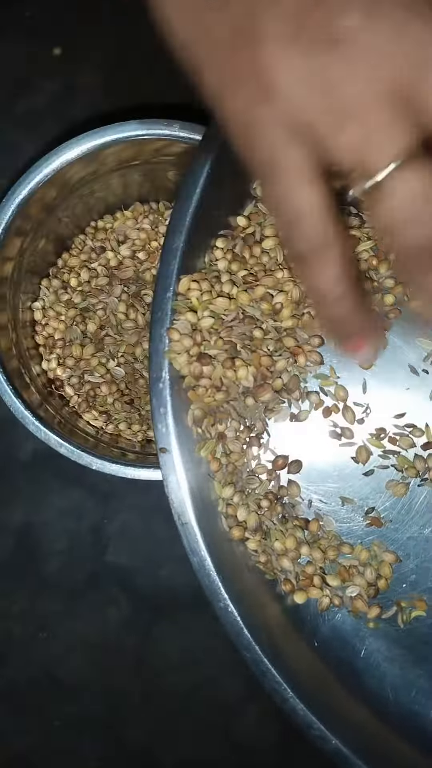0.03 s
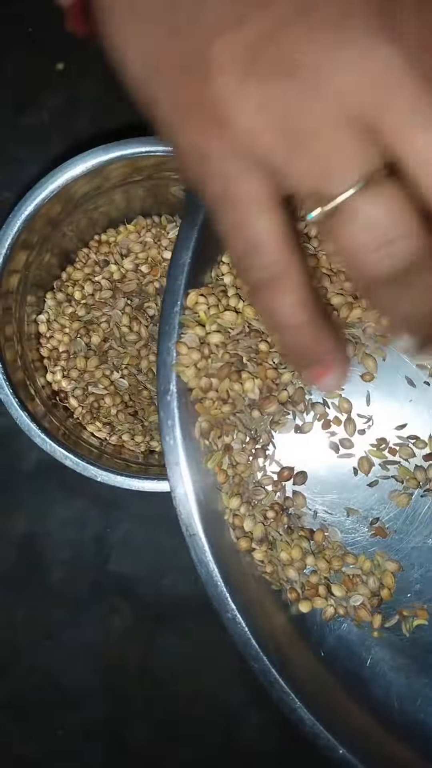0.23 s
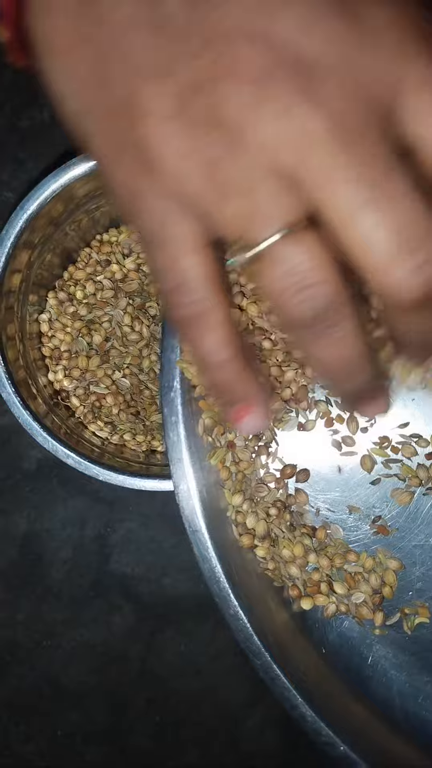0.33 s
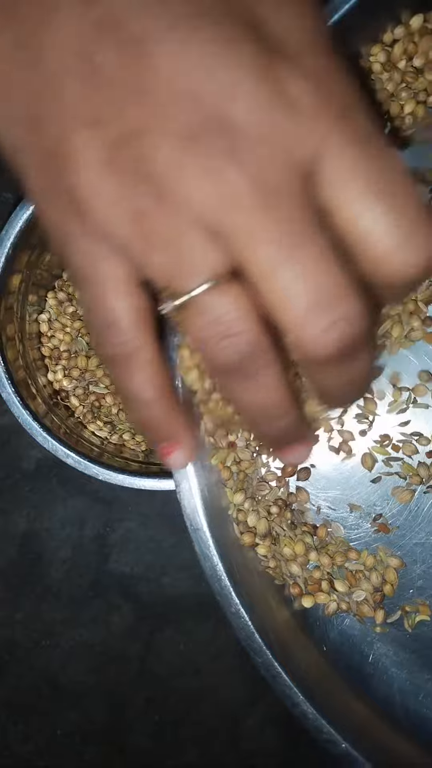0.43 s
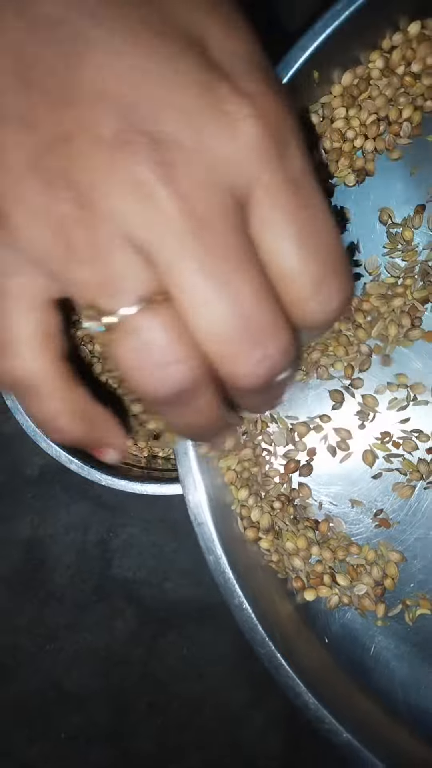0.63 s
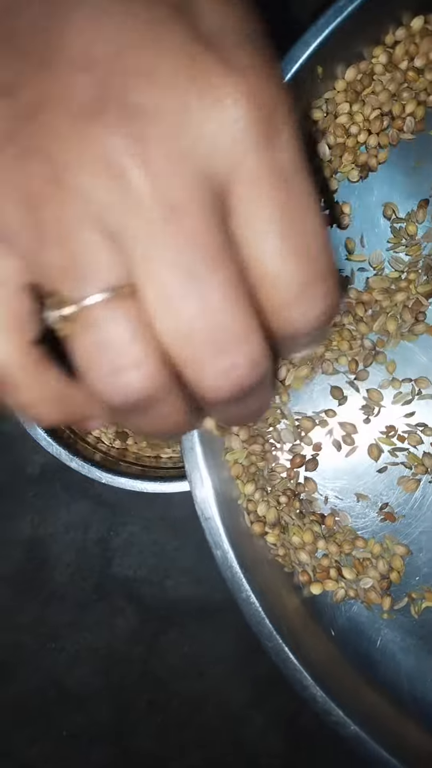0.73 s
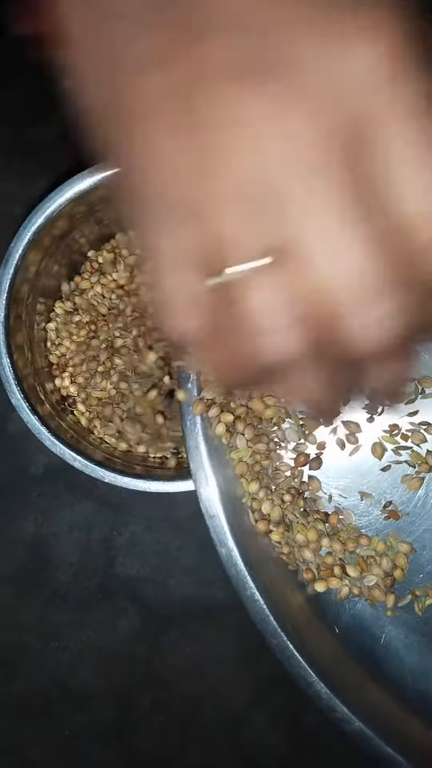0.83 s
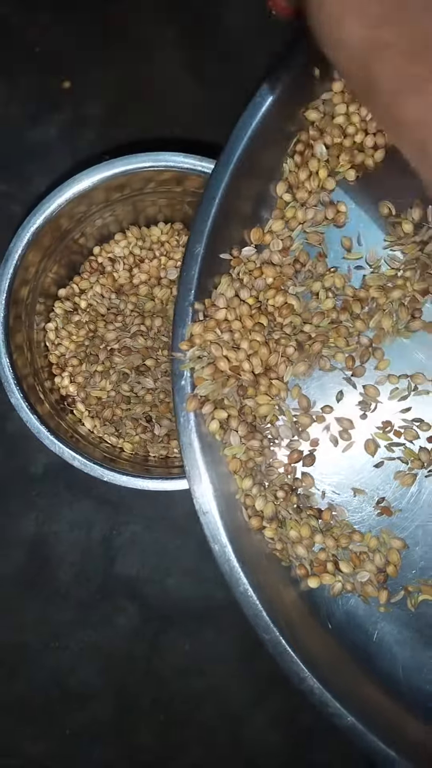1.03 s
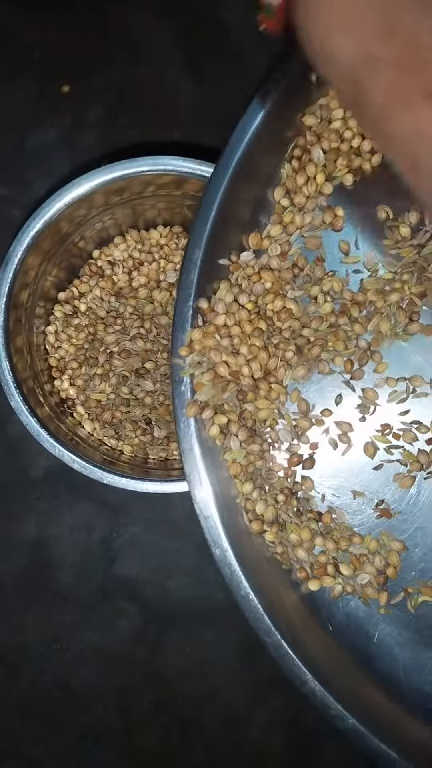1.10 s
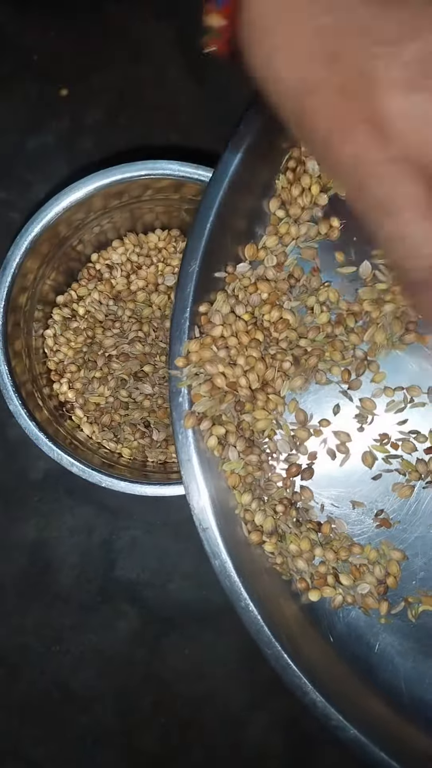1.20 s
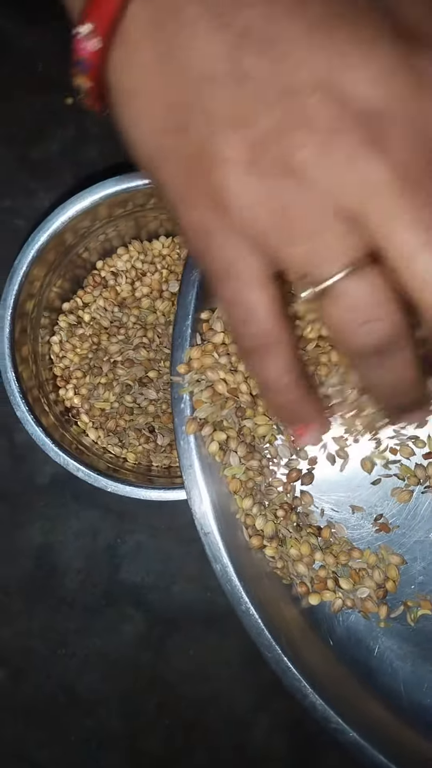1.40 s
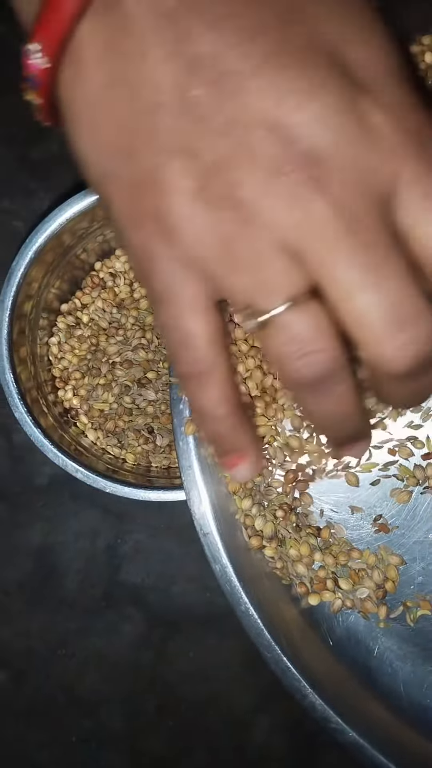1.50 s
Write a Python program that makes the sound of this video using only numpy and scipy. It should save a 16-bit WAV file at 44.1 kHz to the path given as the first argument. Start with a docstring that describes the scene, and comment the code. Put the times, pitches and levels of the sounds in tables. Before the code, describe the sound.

Dry seeds rustle as a hand sweeps them across a steel plate in two strokes, heard close up indoors. The plate knocks on a steel bowl each time, and between strokes seeds patter into the bowl with tiny pings.

```python
"""Indoors, close to a steel plate whose edge rests on a steel bowl, a hand sweeps dry seeds.
Twice the hand lands and the plate knocks on the rim. The seeds rustle under the fingers,
and the plate shudders as the fingers drag to its edge. Seeds spill over and patter into
the bowl, ticking and making the steel ring. A low hum fills the room."""
import sys
import numpy as np
from scipy import signal
from scipy.io import wavfile

SR = 44100
rng = np.random.default_rng(int(sys.argv[2]) if len(sys.argv) > 2 else 0)


def inscribe(sig):
    """Save sig as 16-bit PCM at rate SR to the path in sys.argv[1].

    A 1-D sig is mono; a 2-D sig holds one channel per row.
    Samples are clipped to [-1, 1] before scaling.
    """
    pcm = np.round(np.clip(np.atleast_2d(sig).T, -1, 1) * 32767)
    wavfile.write(sys.argv[1], SR, pcm.astype(np.int16))


N = 68355
T = np.arange(N) / SR
AGE = T[:round(.6 * SR)]  # seconds since a hit


def amp(db):
    """Turns decibels (dB) into a number to multiply by."""
    return 10 ** (np.asarray(db) / 20)


def unit(x):
    """Scales a sound to an average strength (rms) of 1."""
    return x / np.sqrt(np.mean(x ** 2) + 1e-20)


def level(points, column=1):
    """Loudness over time, following one dB column of a table."""
    rows = np.array(points)
    return amp(np.interp(T, rows[:, 0], rows[:, column]))


def through(x, response):
    """Every push in x sets off a copy of the response."""
    return signal.oaconvolve(x, response)[:N]


def impulse(s, db):
    """One instant push at s seconds."""
    return amp(db) * (np.arange(N) == round(s * SR))


def colour(x, tone):
    """Makes each pitch louder or softer, following rows of Hz and dB."""
    hz, db = np.transpose(tone)
    freqs = abs(np.fft.fftfreq(4096, 1 / SR))
    log_gain = np.log(amp(np.interp(np.log(freqs + 1), np.log(hz), db)))
    spectrum = np.exp(signal.hilbert(log_gain).conj())  # nothing sounds before its push
    return through(x, np.fft.ifft(spectrum).real[:len(freqs) // 2])


def soften(x, hz):
    """A softer contact holds less treble."""
    r = np.exp(-2 * np.pi * hz / SR)
    return signal.lfilter([1 - r], [1, -r], x)


def highpass(x, hz):
    """Turns down the bass below hz."""
    return signal.sosfilt(signal.butter(2, hz, "high", fs=SR, output="sos"), x)


def ring(notes):
    """The dying notes of a struck object. In its fade time, a note drops by 60 dB."""
    return sum(amp(db - 60 * AGE / fade_s) * np.sin(2 * np.pi * hz * AGE) for hz, db, fade_s in notes)


def scatter(x, fade_s, tail_db):
    """Adds a quickly dying wash of echoes from the steel and nearby surfaces."""
    tail = rng.standard_normal(len(AGE)) * amp(-60 * AGE / fade_s) * (1 - np.exp(-AGE / 0.001))
    return x + amp(tail_db) * through(x, tail / np.linalg.norm(tail))


def grains(per_s, spread_db):
    """Random tiny hits, most weak and a few strong."""
    size = amp(spread_db * np.minimum(rng.exponential(1, N), 4))
    return size * rng.choice([-1, 1], N) * (rng.random(N) < per_s / SR)


# The room's rumble, then its hum. Each row: pitch in Hz, relative level in dB.
RUMBLE_TONE = [(25, -42.5), (45, -10.5), (65, -8), (92, 2), (125, -3), (170, -1.5), (240, -6.5), (330, -13),
               (450, -24.5), (700, -44), (2000, -49), (15000, -40)]
HUM_NOTES = [(150, -71.5), (200, -80.5)]

def room():
    """A low rumble with a steady hum."""
    hum = sum(amp(db) * unit(np.sin(2 * np.pi * (hz * T + rng.random()))) for hz, db in HUM_NOTES)
    return hum + amp(-70.5) * unit(colour(rng.standard_normal(N), RUMBLE_TONE))


# The tone of a seed's tick. Each row: pitch in Hz, relative level in dB.
TICK_TONE = [(1000, -45), (4000, -31), (6200, -10.5), (8000, -16), (10000, -14.5), (11800, -6),
             (13500, 3.5), (15300, 0), (17000, -17.5)]

def seed_tick(fade_s=.012):
    """A seed lands with a tiny burst of bright noise, different each time."""
    burst = rng.standard_normal(len(AGE)) * amp(-60 * AGE / fade_s)
    tick = colour(burst, TICK_TONE)[:len(AGE)]
    return tick / np.linalg.norm(tick)


# The bowl's notes. Each row: pitch in Hz, relative level in dB, fade time in seconds.
BOWL_NOTES = [(2480, -4, 0.13), (4530, -21, 0.12), (6100, -8, 0.12), (6150, 10, 0.22), (6230, 13, .16),
              (6940, -13, 0.16), (8260, 6.5, 0.07), (10200, 21, 0.066), (12500, 1, .05), (13550, 7, 0.05),
              (14700, -15, 0.071), (14400, -19, 0.075)]

def bowl_ring():
    """The steel bowl rings high and briefly when a seed hits it."""
    return ring(BOWL_NOTES)


# The flow of falling seeds. Each row: time in seconds, tick level in dB, steel level in dB.
SPILL_LEVELS = [(0, -67, -64), (.035, -71, -74.5), (.06, -83.5, -79), (.14, -78, -98.5), (.2, -76, -70.5),
                (.5, -77, -75.5), (.58, -67, -63.5), (.67, -65, -61.5), (.75, -59, -65.5),
                (.83, -58.5, -65), (.93, -57.5, -63.5), (1.0, -67.5, -68.5), (1.05, -63.5, -75),
                (1.11, -71.5, -74.5), (1.35, -87, -76), (1.45, -65, -69.5), (1.55, -77, -70)]
# The tone of the pattered steel. Each row: pitch in Hz, relative level in dB.
STEEL_TONE = [(200, -23), (700, -18), (950, -13.5), (1300, -29.5), (1950, -21), (2350, -6.5), (2700, -10),
              (3050, -13.5), (3300, -27.5), (3600, -12), (4200, -22.5), (4700, -8), (5150, -20), (5650, -7),
              (5900, -7), (6150, -7), (6550, -9), (6900, -9.5), (7500, -20), (9400, -20.5), (15000, -25)]

def spilling(shapes=8, hits_per_s=2200):
    """Falling seeds of several shapes tick on the heap and make the steel ring."""
    streams = [grains(hits_per_s / shapes, spread_db=4.5) for _ in range(shapes)]
    ticks = unit(sum(through(stream, seed_tick()) for stream in streams))
    hits = sum(streams)
    patter = unit(scatter(colour(hits, STEEL_TONE), fade_s=0.043, tail_db=-4.5))
    steel = patter + amp(-11.5) * unit(through(hits, bowl_ring()))
    return level(SPILL_LEVELS) * ticks + level(SPILL_LEVELS, column=2) * steel


# Seeds that stand out; the first row is the bowl already ringing as the scene begins. Each row: start in
# seconds, relative level in dB, extra ring in dB.
SEED_HITS = [(.002, -43.5, 2), (0.082, -34.5, -16), (0.1314, -41.5, -29), (0.6764, -22.5, -3),
             (.6793, -21, -5.5), (.7212, -30, -24), (.776, -26.5, -24), (0.787, -32, -24),
             (0.824, -28, -20), (0.8434, -23.5, -22), (0.952, -34, -7), (1.0191, -20, -10)]

def pings():
    """Single seeds tick and set the bowl ringing; at the very start the bowl is already ringing from earlier
    seeds."""
    bowl = amp(-44.5) * bowl_ring()
    return sum(through(impulse(s, db), amp(-4) * seed_tick() + amp(ring_db) * bowl)
               for s, db, ring_db in SEED_HITS)


# How loud the two hand strokes are. Each row: time in seconds, level in dB.
FIRST_STROKE = [(.145, -115), (.172, -79), (.181, -53.5), (.2, -58.5), (.23, -54), (.3, -59), (.35, -58),
                (.53, -57.5), (.62, -60.5), (.72, -61.5), (.85, -61), (.93, -73), (.98, -115)]
SECOND_STROKE = [(1.08, -115), (1.125, -63), (1.14, -48), (1.155, -57.5), (1.2, -55.5), (1.24, -50.5),
                 (1.3, -58), (1.45, -57.5), (1.55, -58.5)]
# The tone of each stroke. Each row: pitch in Hz, relative level in dB.
FIRST_TONE = [(100, -27), (220, -3), (350, -8), (480, -3.5), (750, -0.5), (950, -2.5), (1200, -0.5),
              (1650, -0.5), (2100, -8), (2500, -4.5), (2850, -5.5), (3150, -10), (3900, -12.5),
              (4700, -12.5), (5900, -10.5), (7000, -15), (8200, -22.5), (10000, -23), (12000, -18.5),
              (15000, -15)]
SECOND_TONE = [(100, -29.5), (200, 1.5), (350, -11), (480, -9), (700, -5), (1000, -4.5), (1300, -5),
               (1720, -1), (2100, -6.5), (2400, -9), (2800, -8), (3400, -14.5), (3750, -14.5), (4100, -15),
               (5900, -14), (7000, -18.5), (8200, -28), (10000, -29), (12000, -21.5), (15000, -19)]

def rubbing():
    """Seed husks scrape on each other and on the plate under each stroke."""
    sound = np.zeros(N)
    for stroke, tone in [(FIRST_STROKE, FIRST_TONE), (SECOND_STROKE, SECOND_TONE)]:
        rustle = colour(grains(per_s=5000, spread_db=2.5), tone)
        sound += level(stroke) * unit(scatter(rustle, fade_s=0.023, tail_db=-4))
    return sound


# The plate's knocks. Each row: start in seconds, relative level in dB, brightness in Hz,
# extra thump in dB, extra ring in dB.
RIM_KNOCKS = [(.2053, -1.5, 3000, 8.5, -1.5), (.2088, -5.5, 3500, 5.5, -6.5), (.2215, -23, 4030, 5, -17),
              (.2507, -2.5, 2260, 3, 2), (.2655, -28, 2000, 16, -15), (.2835, -9.5, 1400, -1, -9),
              (.3065, -19, 1200, 0, -1.5), (1.2270, -8.5, 3000, 3.5, -2.5), (1.2385, -11.5, 2520, 11.5, -4)]
# Soft bumps of the hand. Each row: start in seconds, relative level in dB.
HAND_BUMPS = [(.425, -11.5), (0.673, -17), (0.989, -16.5), (1.014, -42), (1.118, -11)]
# The tone of a knock. Each row: pitch in Hz, relative level in dB.
KNOCK_TONE = [(40, -43), (90, -17), (200, 3.5), (310, -0.5), (430, -12), (620, -11), (900, 4.5),
              (1150, -11), (1400, -10.5), (1950, -22.5), (2450, -20.5), (3100, -14), (4000, -39),
              (6300, -16), (8500, -28), (15000, -17.5)]
# The plate's short notes against the rim, then its longer ringing ones.
# Each row: pitch in Hz, relative level in dB, fade time in seconds.
CLONK_NOTES = [(720, -42.5, 0.042), (943, -28.5, 0.039), (1400, -44.5, 0.04), (2405, -35.5, 0.028)]
PLATE_NOTES = [(202, -29, 0.28), (243.6, -12.5, 0.14), (754, -3.5, .2), (758, -4, 0.5), (809, -8, 0.54),
               (853, -15, 0.42), (917.6, 3, 0.35), (982, 2.5, 0.19), (1058, -10, 0.34), (1040, -24, 0.26),
               (1210, -3, 0.144), (1367, -6, .3), (1474, -17, 0.47), (2500, -7.5, 0.16)]

def knocks(thump_hz=215, thump_fade_s=0.029):
    """The plate hits the rim with a clonk, a low thump and a ring. Soft bumps only thump."""
    blows, thump_blows, ring_blows = np.zeros((3, N))
    for s, db, bright_hz, thump_db, ring_db in RIM_KNOCKS:
        blow = soften(impulse(s, db), bright_hz)
        blows += blow
        thump_blows += amp(thump_db) * blow
        ring_blows += amp(ring_db) * blow
    thump_blows += sum(impulse(s, db) for s, db in HAND_BUMPS)
    thump = through(thump_blows, highpass(ring([(thump_hz, -37, thump_fade_s)]), hz=108))
    contact = amp(5) * colour(highpass(blows, hz=86), KNOCK_TONE)
    clonk = through(blows, highpass(ring(CLONK_NOTES), hz=453))
    ringing = amp(-45.5) * through(ring_blows, highpass(ring(PLATE_NOTES), hz=123))
    return scatter(contact + clonk + thump, fade_s=0.23, tail_db=-9) + ringing


# The drag to the edge. Each row: time in seconds, shudder level in dB, scrape level in dB.
DRAG_LEVELS = [(.45, -110, -110), (.55, -74, -65), (.58, -67, -62.5), (.65, -69, -61.5), (.705, -76, -64.5),
               (.722, -55.5, -66), (.745, -55.5, -68), (.77, -64.5, -64), (.802, -58, -59),
               (.83, -62.5, -74), (.9, -63.5, -72), (.96, -72, -76.5), (1.03, -72, -88),
               (1.08, -73.5, -100)]
# The low shudder, then the bright scrape. Each row: pitch in Hz, relative level in dB.
SHUDDER_TONE = [(100, -20), (300, -22), (450, -5.5), (580, -19), (730, -6), (900, -2), (1000, -4),
                (1150, -28), (1400, -15), (1800, -55), (3000, -34.5)]
SCRAPE_TONE = [(1000, -32), (2000, -18), (2330, 7), (2520, 8.5), (2700, 1), (3100, -22), (5000, -50)]

def dragging():
    """Small slips of the fingers shake the plate and scrape seeds along the steel."""
    slips = grains(per_s=1200, spread_db=1.0)
    shudder = level(DRAG_LEVELS) * unit(colour(slips, SHUDDER_TONE))
    scrape = level(DRAG_LEVELS, column=2) * unit(colour(slips, SCRAPE_TONE))
    return shudder + scrape


# The tapped plate's notes. Each row: pitch in Hz, relative level in dB, fade time in seconds.
TAP_NOTES = [(670, -3, .03), (1220, -3, 0.044), (1730, 2, 0.019), (3540, -9, 0.053)]

def tap():
    """A fingernail gives the plate a light tap just before the second stroke."""
    return through(impulse(s=1.0868, db=-58.5), ring(TAP_NOTES))


# Hard hits on the steel. Each row: start in seconds, relative level in dB, brightness in Hz.
CLACK_HITS = [(1.1213, -29.5, 2000), (1.129, -31, 5960), (1.1351, -24, 6000), (1.1398, -24.5, 4100),
              (1.1451, -26.5, 3030), (1.2057, -13.5, 8000), (1.2066, -15.5, 8000), (1.21, -19.5, 8840),
              (1.221, -19, 2500), (1.2412, -26, 1500)]
# The tone of a clack. Each row: pitch in Hz, relative level in dB.
CLACK_TONE = [(50, -40), (150, -20), (400, -18), (700, 1), (1100, -2.5), (1600, 1), (2000, -15), (2450, 4),
              (2800, -11), (3350, 3), (4100, -4), (4700, 1.5), (5300, -13), (6700, -7.5), (7700, -15),
              (14000, -20.5)]

def clacks():
    """Fingers and seeds clack on the steel as the hand comes down again."""
    blows = sum(scatter(soften(impulse(s, db), bright_hz), fade_s=0.013, tail_db=1)
                for s, db, bright_hz in CLACK_HITS)
    return scatter(colour(blows, CLACK_TONE), fade_s=0.29, tail_db=-7.5)


def scene():
    """All the sounds add up at one close microphone."""
    return (knocks() + tap() + clacks() + pings() + rubbing() + spilling() + dragging() + room())[None]


def record(dry, top_hz=15550):
    """The microphone loses the deepest bass and the highest treble."""
    treble_cut = signal.firwin(801, top_hz, window=("kaiser", 8), fs=SR)
    return signal.oaconvolve(highpass(dry, hz=55), treble_cut[None], "same")


dry = scene()
out = record(dry)
inscribe(out)
```